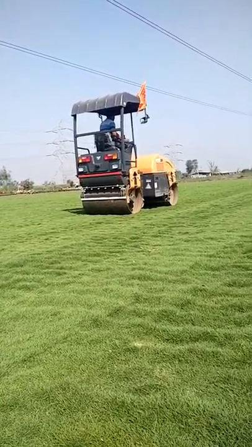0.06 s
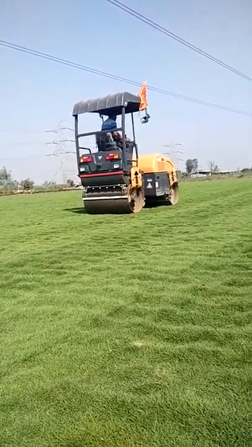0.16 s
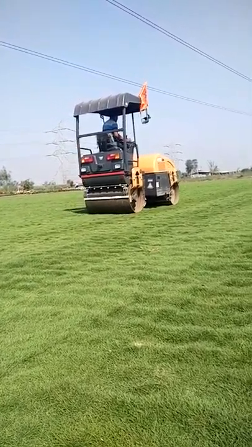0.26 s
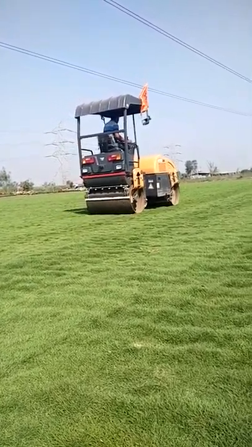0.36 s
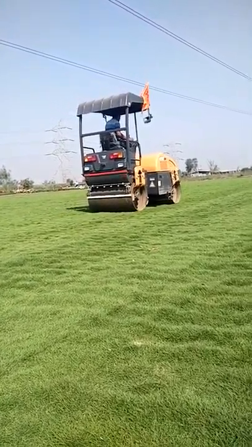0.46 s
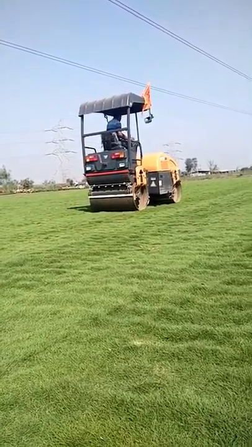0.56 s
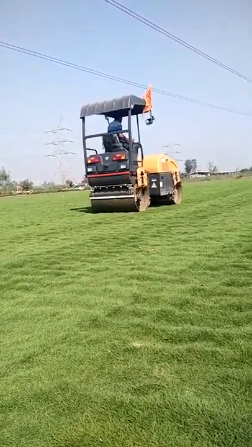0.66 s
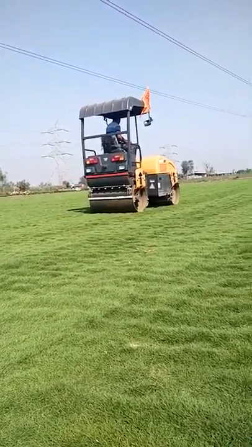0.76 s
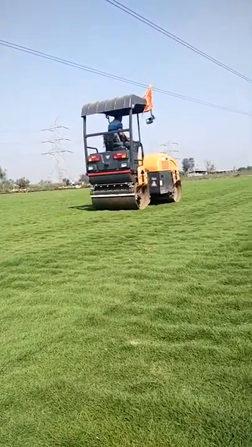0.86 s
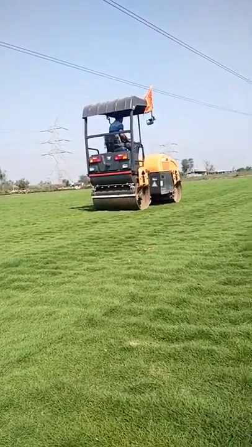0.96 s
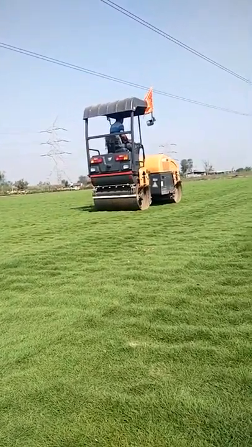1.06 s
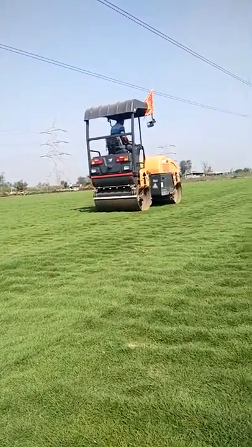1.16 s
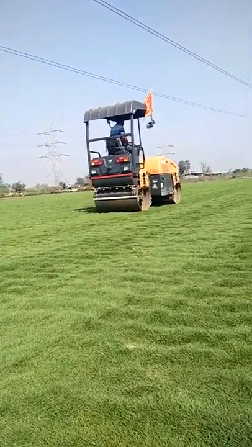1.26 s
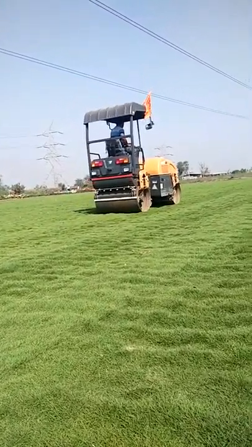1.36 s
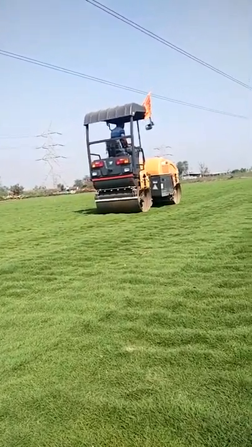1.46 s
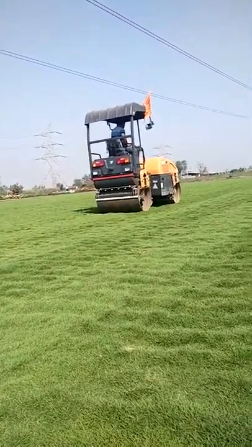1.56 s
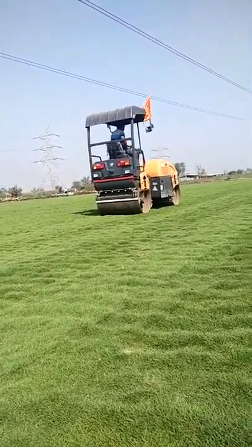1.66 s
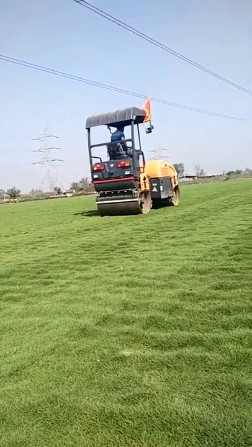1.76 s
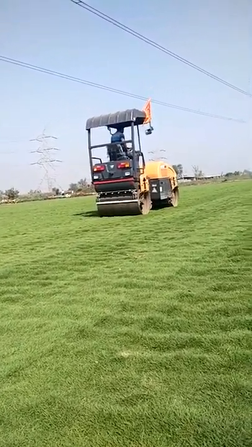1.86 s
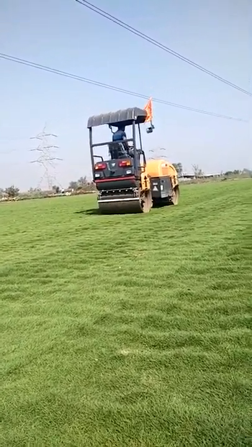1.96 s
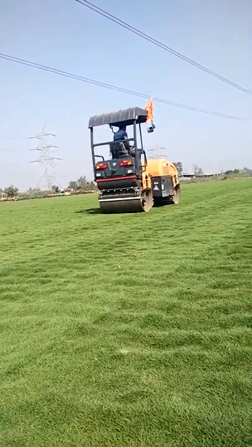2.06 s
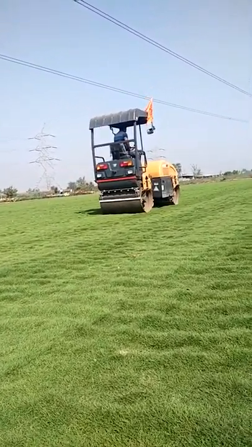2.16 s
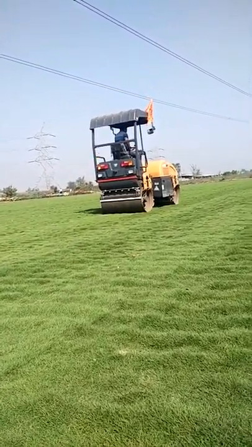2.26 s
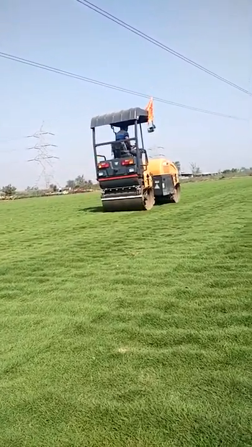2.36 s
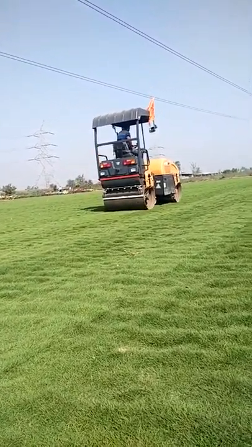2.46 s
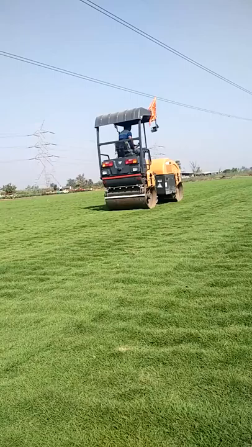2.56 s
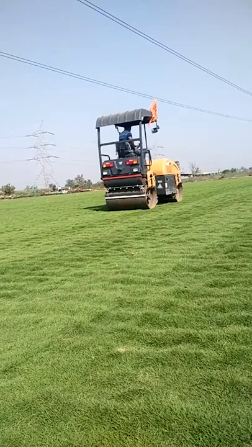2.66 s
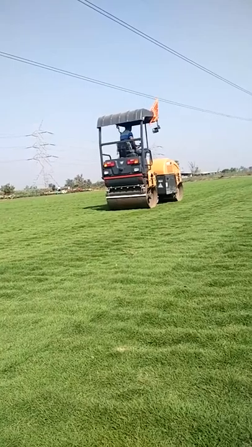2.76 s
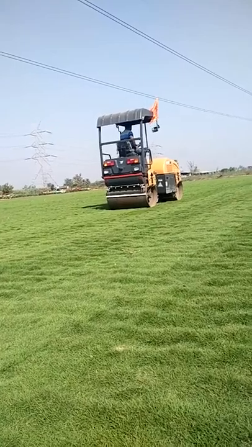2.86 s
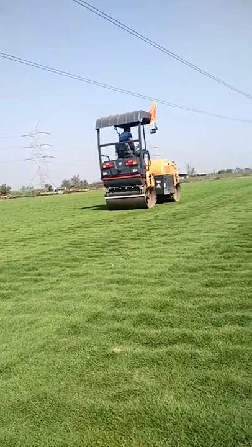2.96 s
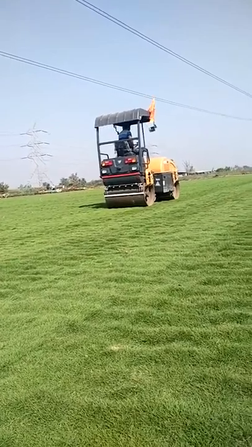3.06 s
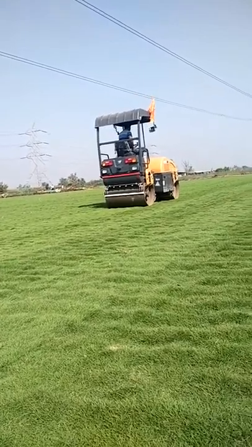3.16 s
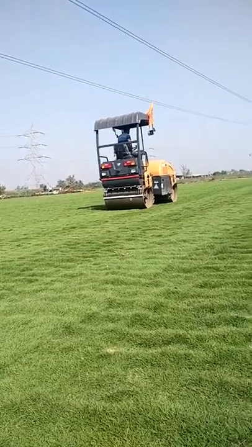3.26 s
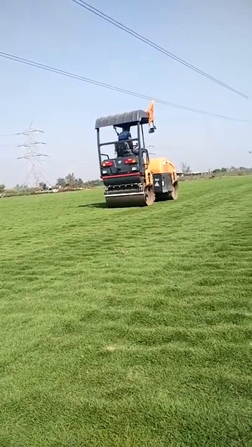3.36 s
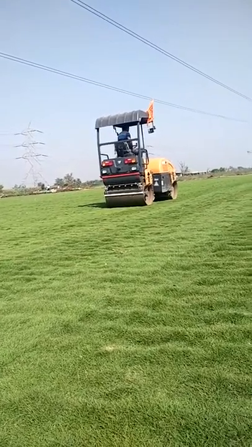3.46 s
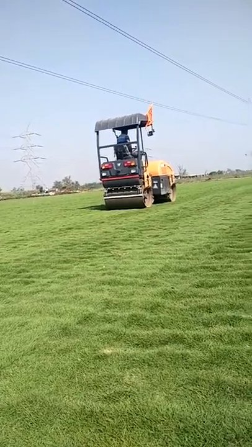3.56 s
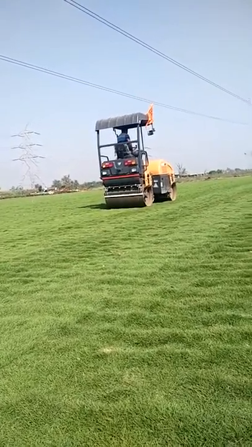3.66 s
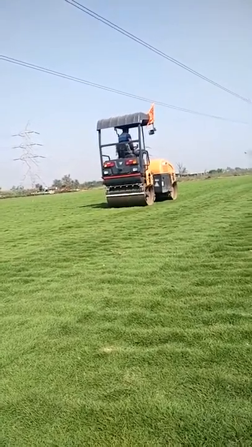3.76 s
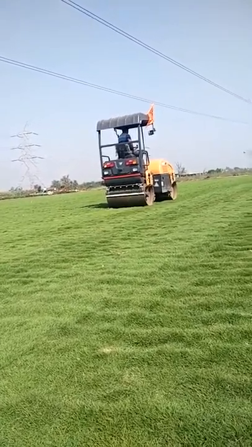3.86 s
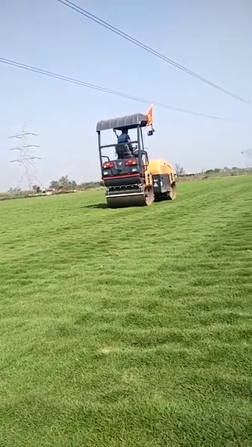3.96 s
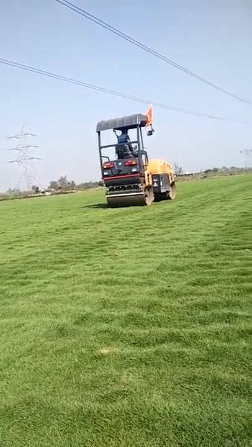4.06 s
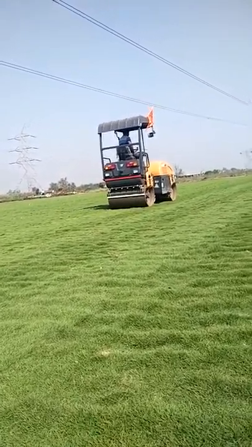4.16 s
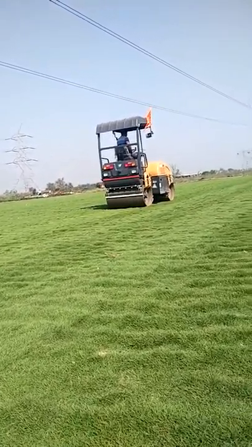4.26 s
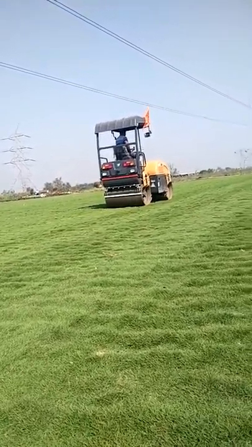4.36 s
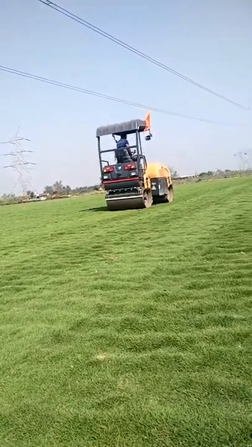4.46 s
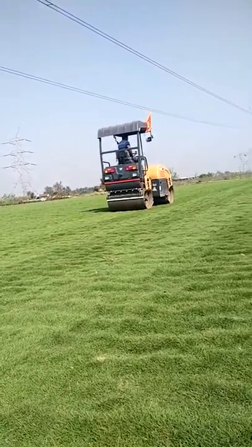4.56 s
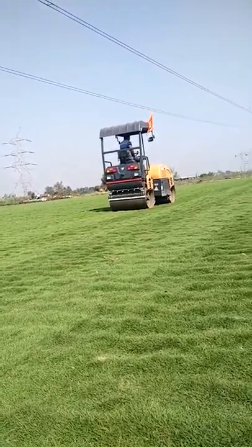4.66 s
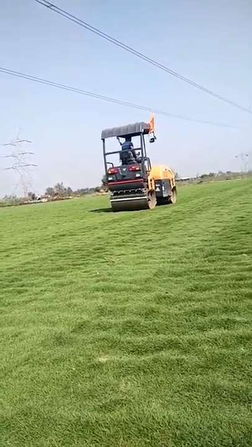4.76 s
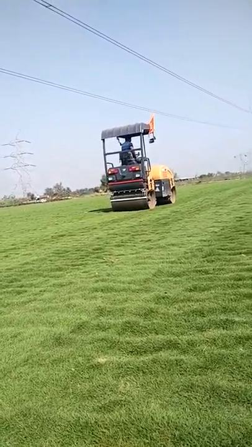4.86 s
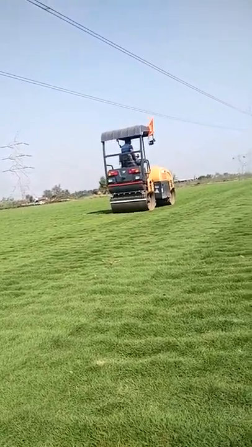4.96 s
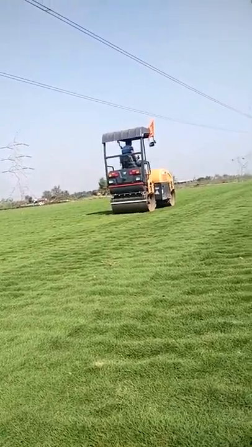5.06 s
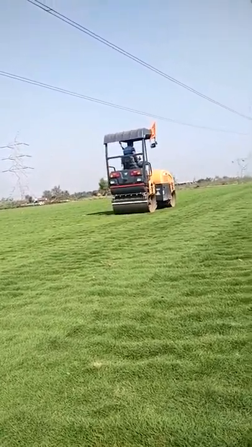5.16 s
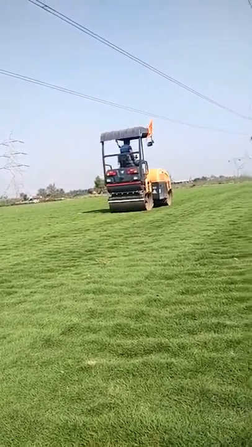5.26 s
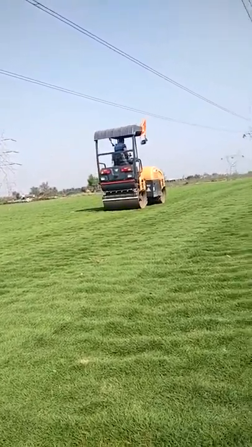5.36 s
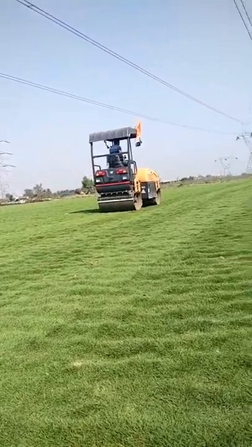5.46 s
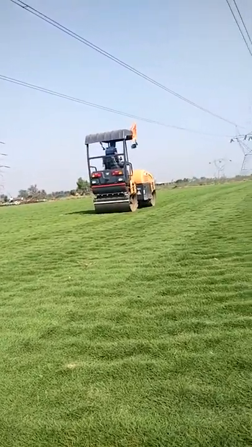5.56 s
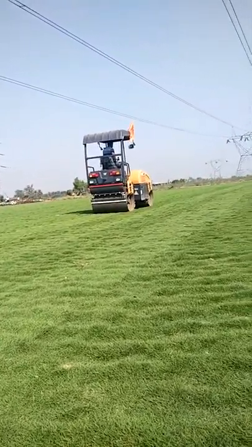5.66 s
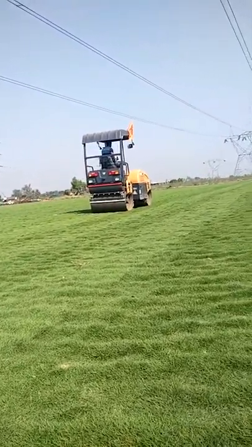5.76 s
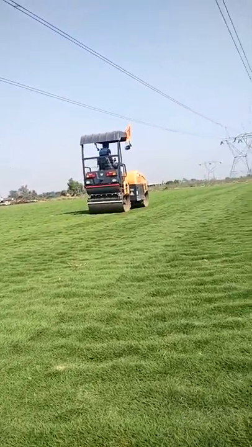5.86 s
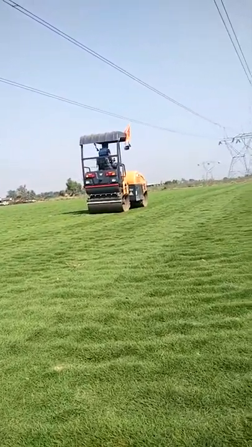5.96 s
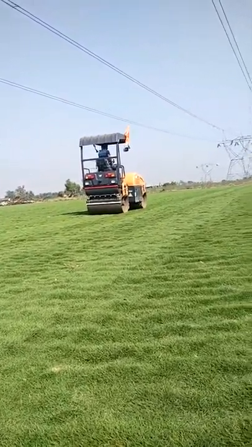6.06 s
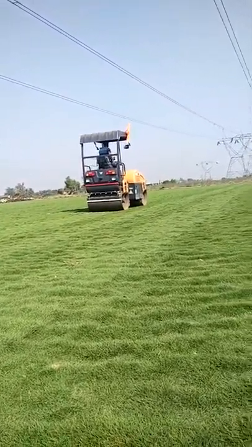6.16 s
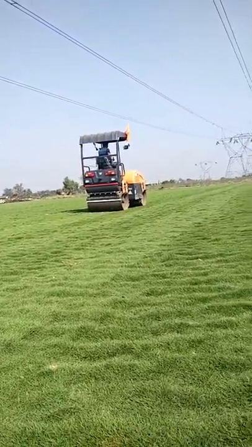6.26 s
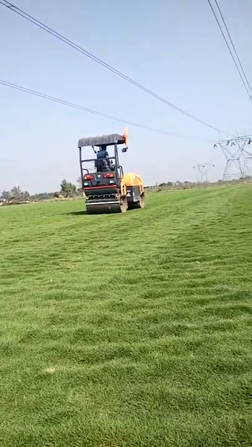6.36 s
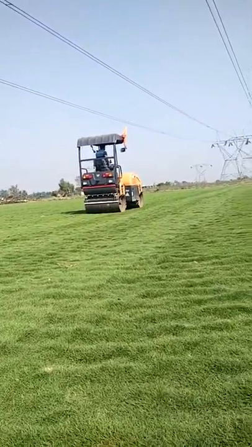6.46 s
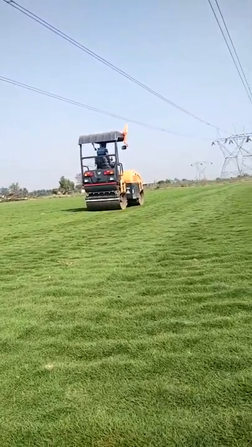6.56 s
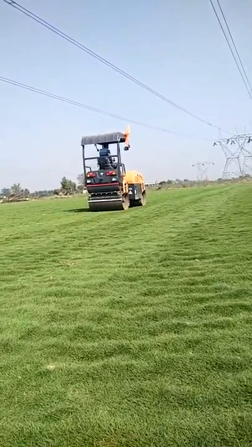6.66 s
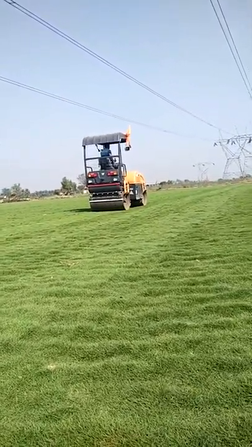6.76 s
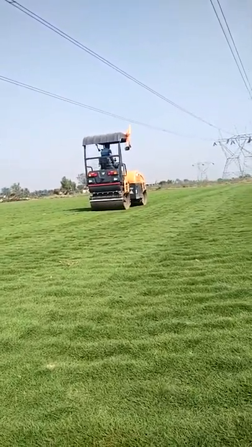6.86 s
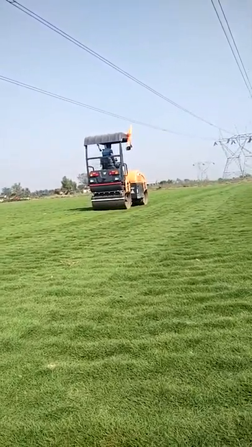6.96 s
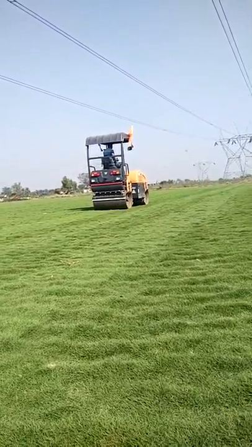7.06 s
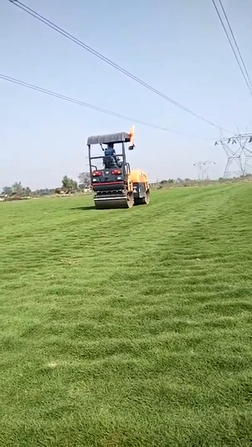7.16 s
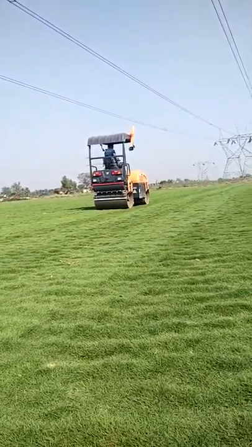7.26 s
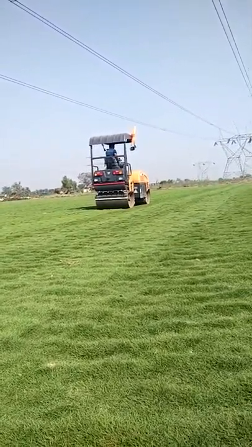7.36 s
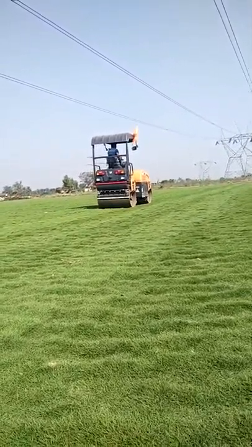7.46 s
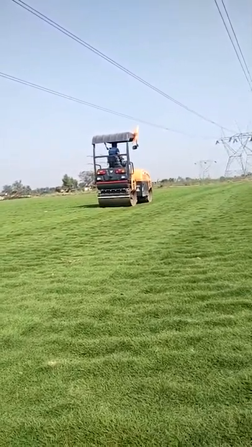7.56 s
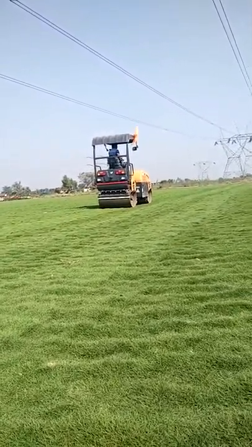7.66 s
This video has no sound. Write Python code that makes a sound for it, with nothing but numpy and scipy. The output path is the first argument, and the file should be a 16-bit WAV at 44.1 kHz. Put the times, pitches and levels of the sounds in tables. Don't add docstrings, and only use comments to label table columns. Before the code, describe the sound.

A small diesel road roller moves away across grass in the open air, heard from behind on a phone microphone. From 0 to 2 s it is loudest: a steady buzzing hum around 78 Hz and its octave, rough exhaust roar, fast metallic rattling at 3 to 4.5 kHz, dozens of short steel knocks, dull thuds and a wet, grassy hiss. The engine labours and the drum throbs deeply near 50 Hz around 0.5 s and 1.6 s; the frame sings briefly near 0.5 s. By 2.3 s the spray hiss is gone and the level drops. Milder labouring and throb swells come near 3, 4.3, 5.5 and 6.9 s, with small rattle flurries, jingling pins and faint high scraper hiss and squeal. The engine speed drifts gently up and down throughout. By 7.7 s a quieter, duller drone remains over faint air hiss.

```python
import sys
import numpy as np
from scipy import signal
from scipy.fft import rfft, irfft, next_fast_len
from scipy.io import wavfile
from scipy.ndimage import uniform_filter1d, map_coordinates

SR = 44100
rng = np.random.default_rng(int(sys.argv[2]) if len(sys.argv) > 2 else 0)


def store_wav(level_fs):
    pcm = np.round(np.clip(np.atleast_2d(level_fs), -1, 1) * 32767)
    wavfile.write(sys.argv[1], SR, pcm.T.astype(np.int16))


def volts(x):
    e = np.asarray(x, float) / 20
    return 10 ** e


N = 339570

# [t/s, half width/s, gain of the first order/dB]
LABOURS = [
    (0.49, 0.22, 15.5),
    (1.29, 0.099, 3.8),
    (1.67, 0.2, 11.5),
    (2.14, 0.12, 3),
    (2.97, 0.19, 6),
    (4.34, 0.22, 8),
    (5.52, 0.22, 9.5),
    (6.86, 0.29, 6),
]
# [t/s, level/dB]
FRAME_SHAKE = [(0.0, -43.5), (0.27, -39.5), (0.69, -40), (1.07, -44), (1.35, -40.5), (1.65, -37.5),
               (1.98, -45.0), (2.45, -59), (2.87, -48.5), (3.41, -54.5), (3.78, -58.5), (4.24, -48),
               (4.86, -65.5), (5.57, -51.5), (6.16, -67.5), (6.9, -62.4), (7.24, -71.5), (7.7, -75)]
# [t/s, peak level/dB, ring f/Hz]
BLOWS = [(0.0243, -29, 3440), (0.0752, -32, 3430), (0.1915, -27, 2860), (0.2169, -30, 3460),
         (0.2294, -27, 3490), (0.3581, -31, 3530), (0.4489, -23, 4380), (0.4873, -27, 3700),
         (0.5526, -24, 4300), (0.5786, -24, 3520), (0.6045, -23, 4330), (0.7053, -23, 3620),
         (0.8076, -32, 4270), (0.8455, -28, 4360), (1.1223, -31, 2820), (1.1488, -28, 3600),
         (1.491, -27, 2860), (1.5439, -27, 3570), (1.5833, -27, 3530), (1.711, -24, 2880),
         (1.7629, -26, 4310), (1.8253, -25, 2860), (2.0028, -30, 2850), (2.1535, -32, 3400),
         (2.811, -36, 4330), (2.9647, -34, 4350), (3.0679, -34, 3580), (3.4466, -37, 2860),
         (5.4555, -36, 3500), (0.165, -24.5, 3430), (0.2683, -21, 3490), (0.3202, -16, 3520),
         (0.399, -23, 4410), (0.4486, -26, 2140), (0.5013, -24, 4370), (0.6409, -36.5, 4500),
         (0.6809, -28.5, 3540), (0.9338, -33, 3500), (1.0849, -27, 2700), (1.2361, -24, 3450),
         (1.3397, -19.5, 2870), (1.4037, -20, 3430), (1.4673, -32, 2770), (1.6083, -23, 2720),
         (1.6861, -20, 3640), (1.915, -28, 3480), (1.9657, -27, 2850), (2.066, -28, 3400),
         (2.6185, -32.5, 2750), (2.7212, -34, 4400), (2.9011, -29, 2860), (3.0804, -28, 3560),
         (3.2702, -35.5, 2840), (4.0796, -30, 3470), (5.3645, -38, 3500), (6.57, -49, 3480),
         (5.941, -47, 3300), (6.61, -49, 4200), (5.4295, -35, 4270), (5.5965, -34, 4240),
         (5.6985, -34, 4260), (6.8505, -39, 2870)]
# [f/Hz, width/Hz, level/dB]
CANOPY_TONES = [(2200, 110, -13), (2870, 77, 7.5)]
COVER_TONES = [(3490, 137, 11.5), (3670, 94, -7.5)]
GUARD_TONES = [(4297, 235, 10), (4780, 52, -6), (5310, 140, 0.5)]


def unit(x):
    return x / np.sqrt(np.mean(x ** 2) + 1e-20)


def curves(rows):
    s, *cols = np.transpose(rows)
    return [np.interp(np.arange(N) / SR, s, c) for c in cols]


def wobble(rate):
    coarse = np.arange(0, N + 64, 64)
    knots = rng.standard_normal(int(N * rate / SR) + 4)
    return np.interp(np.arange(N), coarse, map_coordinates(knots, [coarse * rate / SR]))


def smooth(shape):
    coarse = np.arange(0, N + 64, 64)
    return np.interp(np.arange(N), coarse, shape(coarse / SR))


def swells(rows):
    return smooth(lambda t: sum(db * np.exp(-((t - s) / w) ** 2) for s, w, db in rows))


def filtered(x, response):
    m = next_fast_len(N + 8192, True)
    return irfft(rfft(x, m) * response(np.fft.rfftfreq(m, 1 / SR)), m)[:N]


def coloured(x, spectrum):
    hz, db = np.transpose(spectrum)
    return unit(filtered(x, lambda f: volts(np.interp(np.log(f + 1), np.log(hz + 1), db, -120, -120))))


def rush(spectrum, patchy_db):
    z = signal.stft(rng.standard_normal(N), nperseg=2048)[2]
    field = uniform_filter1d(rng.standard_normal(z.shape), size=2, axis=0)
    field = uniform_filter1d(field, size=6, axis=1)
    noise = signal.istft(z * volts(patchy_db * unit(field)), nperseg=2048)[1][:N]
    return coloured(noise, spectrum)


def modes(table):
    def response(f):
        return sum((-1) ** k * volts(db) * 1j * f * w / (c * c - f * f + 1j * f * w)
                   for k, (c, w, db) in enumerate(table))
    return response


def ringing(table, blows):
    m = next_fast_len(N + 4096, True)
    jf = 1j * np.fft.rfftfreq(m, 1 / SR)
    total = 0
    for c, w, db in table:
        wide = 0.33 * c
        peak = jf * jf * (w * wide) / ((c * c + jf * (jf + w)) * (c * c + jf * (jf + wide)))
        swell = 1 + 0.23 * wobble(14)
        total = total + volts(db) * rfft(swell * blows(), m) * peak
    return unit(irfft(total, m)[:N])


def shaken(count, lag, rise, idle, scatter_db, cylinder_db=np.zeros(4)):
    turn, part = np.divmod(count - lag + 4, 1)
    turn = turn.astype(int)
    burst = part / rise * np.exp(1 - part / rise)
    every = np.arange(turn.max() + 1)

    def blows():
        size = volts(scatter_db * rng.standard_normal(len(every)) + np.array(cylinder_db)[every % 4])
        return (idle + size[turn] * burst) * rng.standard_normal(N)
    return blows


def ticks(count, shake_db, hz, fall, lag, rise, db):
    turn, part = np.divmod(count - lag + 4, 1)
    draw = rng.standard_normal((int(turn.max()) + 1, 2))
    detune, size = np.array([.014 * draw[:, 0], volts(2.8 * draw[:, 1])])[:, turn.astype(int)]
    u = part / rise
    tighter = .0012 * shake_db
    pitch = hz * (1 + tighter + .012 * wobble(7) + detune - fall * np.minimum(u / 3, 1))
    ring = np.sin(2 * np.pi / SR * np.cumsum(pitch))
    return volts(db) * unit(size * u * np.exp(1 - u) * (1 - part) * ring)


def firings():
    # [t/s, firing rate f/Hz]
    speed = [(0.215, 77.92), (0.353, 77.06), (0.918, 79.22), (1.589, 77.96), (2.166, 79.81), (2.888, 78.03),
             (3.492, 79.84), (4.124, 77.69), (4.775, 79.89), (5.303, 77.46), (6.079, 79.76), (6.658, 77.93),
             (7.401, 79.29), (7.657, 78.21)]
    s, rate = np.transpose(speed)
    whole, part = np.divmod(np.interp(np.arange(N) / SR, s, np.arange(len(s))), 1)
    eased = np.interp(whole + .5 - .5 * np.cos(np.pi * part), np.arange(len(s)), rate)
    return .295 + np.cumsum(eased) / SR


def exhaust():
    # [t/s, level/dB]
    distance = [(0, 0), (.6, -1), (1.9, -3), (2.2, -3), (2.45, -6.5), (4.2, -7), (5.5, -9.5), (6.1, -9.5),
                (7.7, -11.5)]
    loss_db = curves(distance)[0]
    load_db = swells(LABOURS)
    first_db = -37 + 0.68 * loss_db + load_db
    second_db = -31.5 + loss_db + 0.45 * wobble(3.99)
    roar_db = -37.5 + 1.47 * loss_db + 0.05 * load_db + 0.4 * wobble(6)
    return first_db, second_db, roar_db


def engine(count, first_db, second_db, roar_db):
    # [multiple of the firing rate, level/dB, phase/cycles]
    weak_orders = [(1.25, -16, 0.48), (1.5, -24, -0.091), (2.5, -37.5, -0.6), (3, -18.5, -0.3),
                   (4, -23, 0.04), (5.999, -29, 0.48)]
    # [f/Hz, level per Hz/dB]
    roar_colour = [(100, -54), (170, -13), (186, -19), (206, -17.5), (361, -13), (514, -22.5), (610, -21),
                   (741, -23.5), (889, -32.5), (1400, -34.5), (1720, -36.5), (2020, -27.5), (2460, -27),
                   (2600, -26.5), (3380, -36), (5720, -120)]
    # [f/Hz, level per Hz/dB]
    rumble_colour = [(20, -4), (40, -16), (65, -7), (100, -5.5), (130, -5.5), (190, -10.5), (260, -46)]

    def tone(k, turn):
        return np.sqrt(2) * np.cos(2 * np.pi * (k * count + turn))

    hum = volts(first_db) * tone(1, -0.5) + volts(second_db + 1.06 * wobble(14)) * tone(2, 0)
    load_db = 0.3 * first_db + 0.33 * second_db + 0.32 * (roar_db + 5.5)
    load_db = load_db + 0.12 * swells(LABOURS) - 1.0
    for k, db, turn in weak_orders:
        hum += volts(load_db + db + 1.1 * wobble(4.6)) * tone(k, turn + .06 * wobble(12))
    chug_db = 1.2 * wobble(24) + 1.45 * np.cos(2 * np.pi * count / 4)
    roar = volts(roar_db + chug_db) * rush(roar_colour, patchy_db=3.0)
    return hum + roar + volts(second_db - 10.5) * rush(rumble_colour, patchy_db=3.5)


def frame(roar_db):
    # [f/Hz, level/dB]
    song_tones = [(395, 2.5), (485, -4), (695, 1.5)]
    # [t/s, half width/s, gain/dB]
    singing = [
        (0, 0.046, 30),
        (.47, 0.32, 41.9),
    ]
    # [f/Hz, width/Hz, level/dB]
    bonnet_tones = [(499.5, 46, 11.5), (763, 78, 9.5), (1226, 55, -1), (1590, 190, 2.5)]
    # [t/s, half width/s, gain/dB]
    bonnet_swells = [
        [(.6, .15, 3), (1.0, .12, 4), (1.7, .1, 4), (.05, .1, 5), (4.2, .2, 3), (5.85, .2, 7), (7.08, .12, 6)],
        [(.05, .08, -5), (.85, .12, -5), (4.2, .2, 4), (.3, .08, 5), (1.4, .12, 5), (1.75, .12, 4), (2.2, .15, 4), (5.75, .2, 5)],
        [(.05, .08, -5), (.3, .2, 7), (.9, .05, 4), (1.1, .12, 4), (1.7, .3, -5), (2.12, .06, 4)],
        [(.3, .25, 3), (1.1, .12, 3), (1.65, .12, 4), (2.15, .3, 5)],
    ]
    song_gain_db = swells(singing)
    t = np.arange(N) / SR
    song = sum(volts(db + 3.5 * wobble(14)) * np.sin(2 * np.pi * hz * t + 0.9 * wobble(15))
               for hz, db in song_tones)
    rows = iter(bonnet_swells)
    drone = ringing(bonnet_tones, lambda: volts(swells(next(rows))) * rng.standard_normal(N))
    drone_db = roar_db - 13.5 + 0.08 * song_gain_db + 1.0 * wobble(3.2)
    return volts(song_gain_db - 85 + 2.5) * song + volts(drone_db) * drone


def shaking():
    return curves(FRAME_SHAKE)[0] + 45


def chatter(part_hz):
    die_s, shared, reach_hz = 0.045, 0.3, 400
    kicks = np.zeros(N)
    for s, db, hz in BLOWS:
        kicks[round(s * SR)] = shared + (1 - shared) * np.exp(-((hz - part_hz) / reach_hz) ** 2)
    return signal.lfilter([1], [1, -np.exp(-1 / (die_s * SR))], kicks)


def looseness():
    # [level at middle shake/dB, gain per dB of shake/dB, f of the knocks it answers most/Hz,
    # chatter after a knock/dB]
    parts = [
        (-40.5, 1.01, 3500, 2.5),
        (-40.5, 1.03, 3490, 2),
        (-40, 1.37, 4300, 1),
        (-49.5, 1.04, 6500, -0.5),
    ]
    # [t/s, half width/s, gain/dB]
    canopy_fits = [(.41, .42, -6), (.7, 0.027, 5.5), (.95, 0.11, 5.5), (1.37, 0.032, 4.5),
                   (1.57, 0.018, -8), (1.63, 0.021, 4.5), (2.87, .02, -8), (3.47, 0.023, 6.5),
                   (4.21, 0.034, -9), (5.35, .45, -2), (5.75, 0.043, 3), (6.3, 0.17, -3), (6.88, 0.073, 5),
                   (7.15, 0.25, 4)]
    cover_fits = [(.43, 0.064, -5.5), (.58, 0.018, 4), (0.751, .29, -2), (.85, .08, -5), (3.95, .1, -3),
                  (1.55, 0.033, -4), (1.86, 0.035, -10), (2.88, .32, 0), (3.1, 0.059, 5.5),
                  (4.09, 0.023, 3), (4.31, .24, -4), (5.47, 0.034, 4.5), (5.65, .13, -5),
                  (6.08, 0.092, 4.5), (6.6, 0.093, 7)]
    guard_fits = [(.15, 0.29, -6.5), (.32, 0.031, 5), (.55, 0.093, 1.5), (.85, 0.08, -2), (.75, 0.017, -10),
                  (1.01, 0.11, -10), (1.24, .045, -10.5), (1.51, 0.071, -6), (1.78, 0.016, 3.5),
                  (1.4, .08, -3), (1.86, .05, -4), (1.57, .03, -3), (2.8, .05, 5.5), (2.9, 0.034, -12),
                  (2.98, 0.02, 5), (3.4, 0.088, -5), (4.08, 0.042, -11), (4.17, 0.037, 0),
                  (6.75, 0.32, 3.5)]
    latch_fits = [
        (.28, 0.052, 4.5),
        (.55, 0.18, 5.5),
        (1.21, 0.067, -6.5),
        (1.44, 0.27, -3.5),
        (1.54, 0.064, 6.5),
        (2.12, .28, -2.5),
        (2.88, 0.045, 6),
        (4.34, .045, 6),
        (5.16, 0.075, 1.5),
        (5.64, 0.14, 8),
    ]
    shake_db = shaking()
    fits = canopy_fits, cover_fits, guard_fits, latch_fits
    return [db + grows * shake_db + swells(rows) + after_db * chatter(hz) + .6 * wobble(16)
            for (db, grows, hz, after_db), rows in zip(parts, fits)]


def panels(count):
    # [f/Hz, width/Hz, level/dB]
    latch_tones = [(5560, 300, -3), (6510, 300, 0)]
    # [start f/Hz, fall 0-1, lag/cycles, rise/cycles, level/dB]
    cover_tick = (3600, .02, .04, .2, -7)
    guard_tick = (4520, .07, .06, .14, 0)
    latch_tick = (6600, .03, -.07, .09, -2)
    # [start f/Hz, fall 0-1, lag/cycles, rise/cycles, level/dB]
    bracket_tick = (5620, .04, -.05, .1, -58.5)
    # [t/s, half width/s, gain/dB]
    bracket_fits = [
        (.3, .1, 3),
        (.58, .04, 4),
        (1.39, .06, 6),
        (1.6, .06, 3),
        (2.6, .15, 6),
        (3.4, .3, 4),
        (5.0, .2, 3),
        (5.53, .04, 6),
        (5.65, .06, 5),
        (5.8, .06, 5),
    ]
    canopy_db, cover_db, guard_db, latch_db = looseness()
    canopy = ringing(CANOPY_TONES, shaken(count, lag=-0.096, rise=0.072, idle=0.29, scatter_db=1.0))
    cover = ringing(COVER_TONES, shaken(count, lag=0.037, rise=0.095, idle=0.24, scatter_db=1.2,
                                        cylinder_db=[-21, -9.5, -3.0, -6.5]))
    guard = ringing(GUARD_TONES, shaken(count, lag=0.064, rise=0.12, idle=0.2, scatter_db=1.2,
                                        cylinder_db=[-1.1, -1.4, 0.32, -1.3]))
    latch = ringing(latch_tones, shaken(count, lag=-0.066, rise=0.077, idle=0.15, scatter_db=1.8))
    shake_db = shaking()

    def with_ticks(rattle, tick):
        return unit(rattle + ticks(count, shake_db, *tick))

    out = volts(canopy_db) * canopy
    out += volts(cover_db) * with_ticks(cover, cover_tick)
    out += volts(guard_db) * with_ticks(guard, guard_tick)
    out += volts(latch_db) * with_ticks(latch, latch_tick)
    bracket_db = 0.8 * shake_db + swells(bracket_fits)
    return out + volts(bracket_db) * ticks(count, shake_db, *bracket_tick)


def rubbing():
    # [t/s, half width/s, gain/dB]
    bucks = [
        (0.59, 0.345, 6.5),
        (1.63, 0.32, 11),
        (3.11, 0.43, 7.5),
        (4.18, 0.4, 8),
        (5.03, 0.094, 3.4),
        (5.61, 0.41, 14.5),
        (6.37, 0.44, 8),
        (6.88, 0.181, 4),
    ]
    # [t/s, half width/s, gain/dB]
    rubs = [(0.29, 0.259, 9.5), (0.88, 0.18, 8), (1.16, 0.05, 4.5), (1.56, 0.11, 3), (1.87, 0.058, 2),
            (2.53, 0.13, 7), (3.61, 0.132, 5.5), (4.1, 0.26, 5.5), (5.76, 0.48, 4.5), (6.32, 0.068, 4.5),
            (6.66, 0.35, 4.5)]
    t, buck_db = np.arange(N) / SR, swells(bucks)
    press_db = swells(rubs) + 0.09 * buck_db
    hidden = np.clip((t - 5.05) / .5, 0, 1)
    pins_db = -68.5 - 0.93 * t + buck_db + .02 * press_db
    low_db = -73.5 + 0.05 * t + press_db
    high_db = -71.5 - 11 * hidden + 0.86 * press_db
    return pins_db, low_db, high_db


def scrapers(count):
    # [f/Hz, width/Hz, level/dB]
    pin_tones = [(8680, 800, -0.5), (9200, 1800, 0)]
    # [f/Hz, width/Hz, level/dB]
    bar_tones = [(10490, 60, 0), (11030, 50, 2), (11575, 45, 1), (12040, 50, -1), (13620, 120, -1),
                 (14170, 80, 0)]
    # [f/Hz, level per Hz/dB]
    low_hiss = [(6500, -26), (7500, -7.5), (8300, -10), (10500, -8.5), (12500, -9.5), (13200, -10),
                (15700, -28)]
    # [f/Hz, level per Hz/dB]
    high_hiss = [(11500, -23), (12800, 2), (13800, 3), (15000, -2), (15700, -12)]
    pins_db, low_db, high_db = rubbing()
    pins = ringing(pin_tones, shaken(count, lag=-0.027, rise=0.1, idle=0.13, scatter_db=2.5))
    rub = shaken(count, lag=-.05, rise=0.19, idle=0.48, scatter_db=4.0)

    def slips():
        return volts(2.2 * wobble(12)) * rng.standard_normal(N)

    hiss = volts(low_db + 0.5) * coloured(rub(), low_hiss) + volts(high_db - 3.0) * coloured(rub(), high_hiss)
    squeal = volts(low_db - 5.5) * ringing(bar_tones[:4], slips)
    squeal += volts(high_db - 6.0) * ringing(bar_tones[4:], slips)
    return volts(pins_db - 2.5) * pins + hiss + volts(0.58 * (high_db + 70.5)) * squeal


def open_air():
    # [f/Hz, level per Hz/dB]
    air_colour = [(1180, -28), (2000, -14), (2820, 8), (4210, 0), (5040, -1.5), (6300, -3.5), (7290, -28),
                  (12200, -10), (15500, -30)]
    return volts(-56 - 6.0) * rush(air_colour, patchy_db=-2.0)


def spray():
    # [f/Hz, level per Hz/dB]
    spray_colour = [(1700, -42), (2050, -2), (2500, 6), (3500, -4.5), (4500, 0), (5350, 1.5), (5700, -10),
                    (7000, -46)]
    # [t/s, half width/s, gain/dB]
    gushes = [
        (.04, 0.034, 0),
        (.33, .04, 6),
        (.54, 0.4, 3),
        (1.56, 0.13, 4),
    ]
    fade_db = -87 * np.maximum(np.arange(N) / SR - 2.24, 0)
    level_db = -50 + fade_db + swells(gushes) + 5.5 + 1.1 * wobble(25)
    return volts(level_db) * coloured(rng.standard_normal(N), spray_colour)


def knocks():
    out, free, t = np.zeros(N + SR), np.ones(N), np.arange(SR // 20) / SR
    for k, (s, db, hz) in enumerate(BLOWS):
        at = round(s * SR)
        rough = 1 + 0.76 * uniform_filter1d(rng.standard_normal(len(t)), size=30)
        t60 = 0.054 if hz < 4000 else 0.025
        ring = volts(-60 * t / t60) * rough * np.sin(2 * np.pi * hz * t)
        crack = sum(volts(level - 60 * t / 0.015) * np.sin(2 * np.pi * c * t)
                    for c, w, level in (CANOPY_TONES[1], COVER_TONES[0], GUARD_TONES[0]))
        grit = np.diff(uniform_filter1d(rng.standard_normal(len(t) + 2), size=4), 2)
        snap = volts(-60 * t / 0.012) * grit * 1.3
        attack = 1 - np.exp(-t / 0.00068)
        out[at:][:len(t)] += volts(db) * attack * (ring + 0.15 * crack + 0.5 * snap)
        free[max(at - 600, 0):at] = volts(-2 if k < 29 else -6.5)
    return out[:N], uniform_filter1d(free, size=90)


def thuds():
    # [t/s, peak level/dB, ring f/Hz]
    jolts = [(0.154, -27, 266), (0.331, -27, 353), (0.389, -26, 385), (0.515, -27, 253), (0.81, -33, 245),
             (0.857, -30, 390), (1.016, -30, 371), (1.115, -30, 328), (1.225, -30, 315), (1.464, -32, 320),
             (1.559, -30, 242), (1.754, -29, 396), (1.928, -33, 288), (1.976, -32, 318), (2.199, -33, 452),
             (2.385, -37, 320), (3.039, -37, 404), (5.756, -37, 242)]
    out, t = np.zeros(N + SR), np.arange(SR // 10) / SR
    for s, db, hz in jolts:
        ring = np.sin(2 * np.pi * hz * t) + .4 * np.sin(2 * np.pi * 1.7 * hz * t + rng.normal())
        fade = volts(db - 6 - 60 * t / .06)
        out[round(s * SR):][:len(t)] += fade * (1 - np.exp(-t / .003)) * ring * 2
    return out[:N]


def drum():
    # [t/s, turning rate f/Hz]
    spin = [(0.09, 48.9), (0.35, 53.7), (0.76, 51.6), (0.95, 46.7), (1.19, 47.6), (1.7, 53.1), (2.27, 47.9),
            (2.47, 46.9), (3.06, 54.3), (3.6, 46.6), (3.86, 48.2), (4.16, 53.0), (4.5, 52.8), (4.92, 46.5),
            (5.67, 53.4), (6.27, 46.1), (6.94, 54.2), (7.45, 47.2)]
    # [middle t/s, length/s, peak level/dB]
    throbs = [(0.16, 0.3, -39), (0.486, 0.44, -19.5), (0.87, 0.44, -39), (1.303, 0.3, -27.5),
              (1.633, 0.52, -21.5), (2.08, 0.35, -25), (2.31, 0.33, -36), (2.784, 0.66, -32.5),
              (3.253, 0.45, -32), (3.54, 0.3, -43.4), (3.742, 0.26, -37.5), (4.01, 0.21, -46),
              (4.37, 0.47, -29.7), (4.71, 0.28, -52), (4.85, 0.26, -51.3), (5.178, 0.4, -41.5),
              (5.52, 0.53, -32.6), (5.998, 0.63, -40.5), (6.682, 0.77, -36), (7.18, 0.46, -37),
              (7.5, 0.6, -44)]

    def arch(u):
        return np.abs(np.cos(np.pi * np.clip(u, -.5, .5))) ** 1.37

    level = volts(-68) + smooth(lambda t: sum(volts(db) * arch((t - s) / span) for s, span, db in throbs))
    angle = 2 * np.pi * np.cumsum(curves(spin)[0]) / SR
    return level * np.sqrt(2) * (np.sin(angle) + volts(-35) * np.sin(2 * angle))


def turf(x):
    # [f/Hz, width/Hz, depth 0-1]
    near_dips = [(990, 120, .5), (1810, 160, .75), (5350, 200, .5), (5850, 140, .85), (7950, 500, .7)]
    far_dips = [(520, 70, .35), (870, 120, .5), (1690, 220, .7), (5050, 450, .75), (5760, 160, .7),
                (7350, 700, .6), (10300, 250, .6), (13050, 250, .6)]
    # [t/s, share of the far pattern 0-1]
    away = [
        (2.5, 0),
        (4.8, 0.34),
        (5.4, 1),
    ]

    def dips(table):
        return lambda f: np.prod([1 - depth * modes([(c, w, 0)])(f) for c, w, depth in table], axis=0)

    far = np.clip(curves(away)[0], 0, 1)
    return (1 - far) * filtered(x, dips(near_dips)) + far * filtered(x, dips(far_dips))


def scene():
    count, pipe_db = firings(), exhaust()
    blows, free = knocks()
    steel = filtered(free * panels(count) + blows, lambda f: 1 / np.sqrt(1 + (f / 6900) ** 30))
    machine = engine(count, *pipe_db) + frame(pipe_db[2]) + steel + scrapers(count)
    ground = spray() + thuds() + drum()
    return turf(machine + ground + open_air())[None]


def top_cut(x):
    return signal.sosfilt(signal.butter(12, 15640, fs=SR, output="sos"), x)


def record(dry):
    top_hz = 15520
    mix = filtered(dry[0], lambda f: np.where(f < top_hz, 1, volts(-2 - .06 * (f - top_hz))))[None]
    return top_cut(mix)


dry = scene()
out = record(dry)
store_wav(out)
```